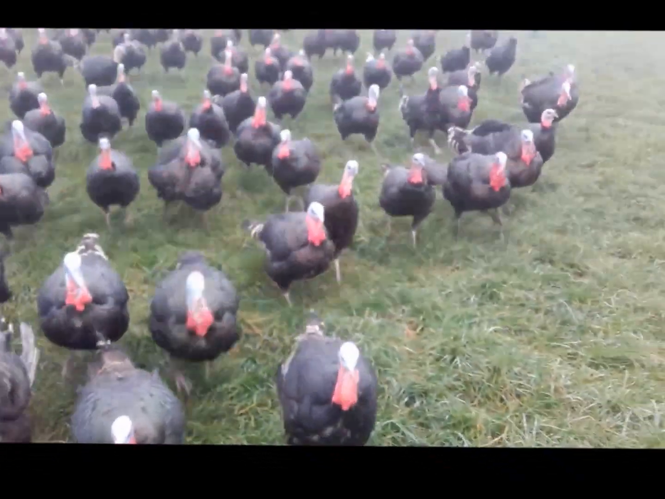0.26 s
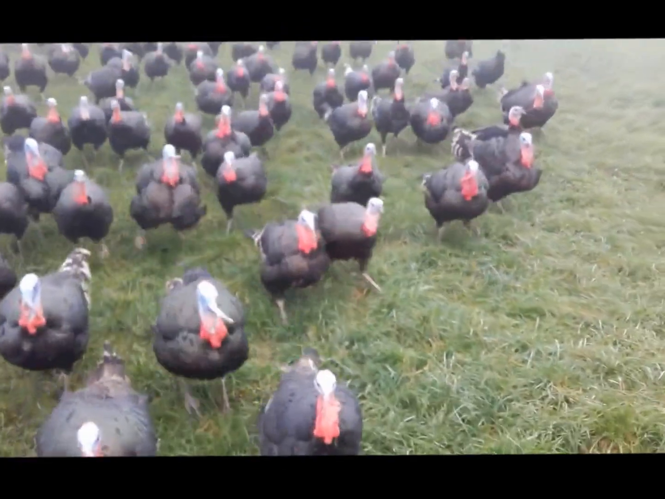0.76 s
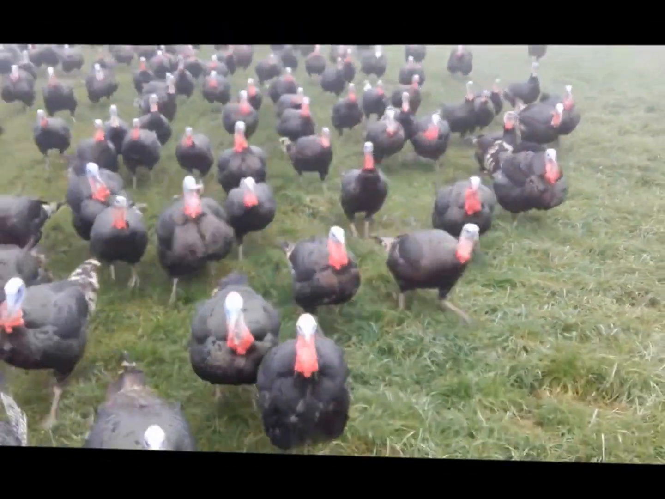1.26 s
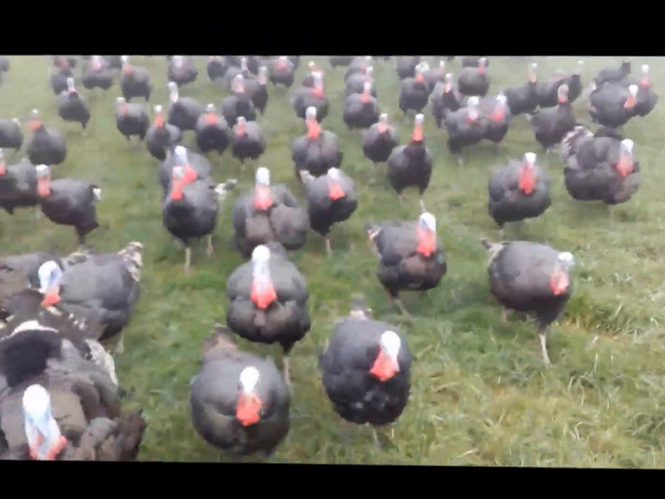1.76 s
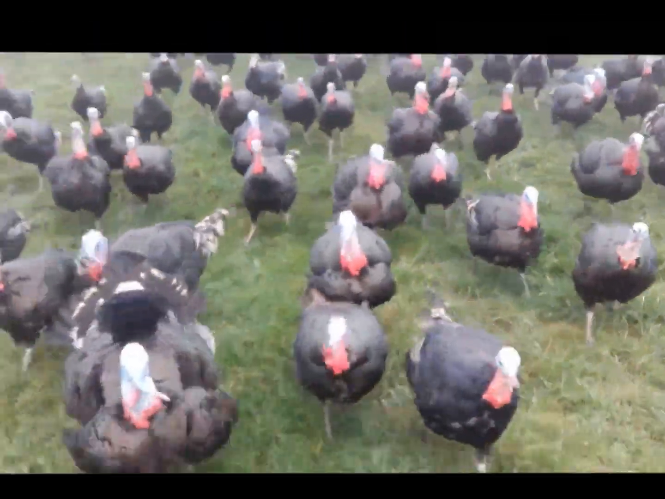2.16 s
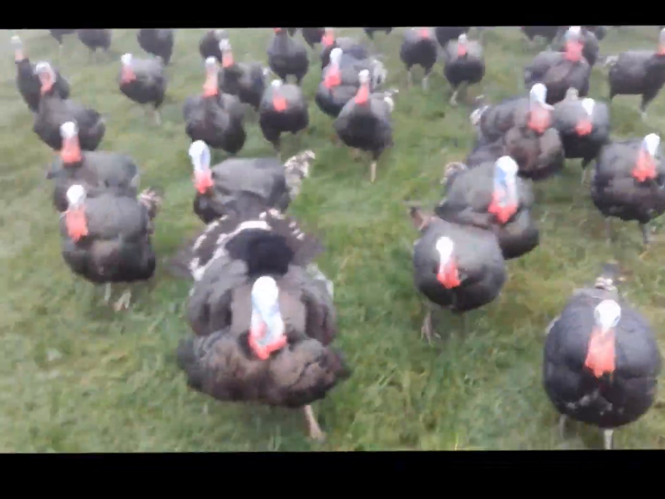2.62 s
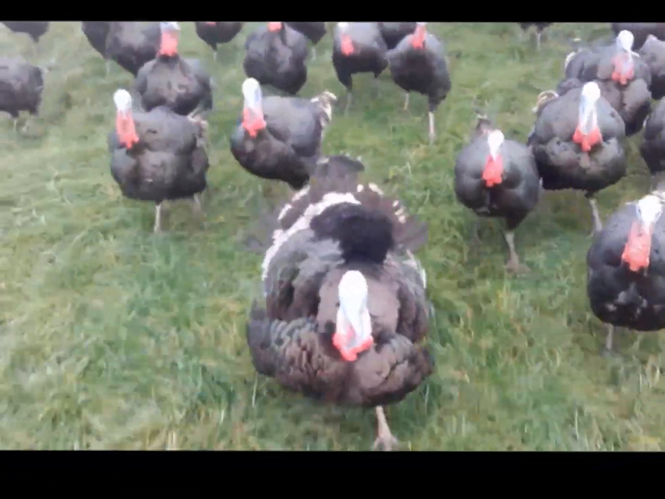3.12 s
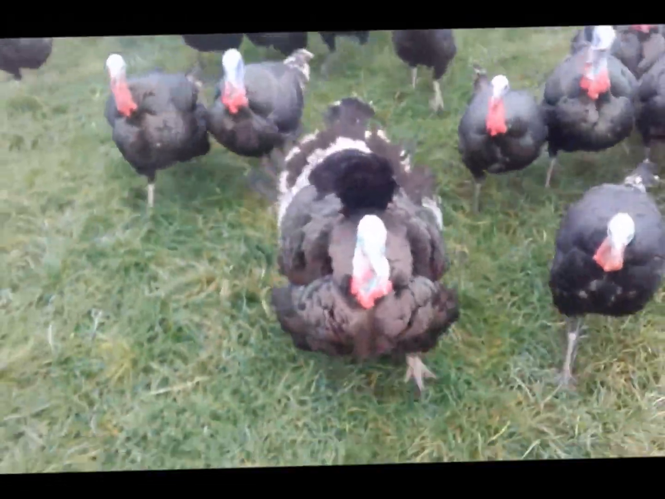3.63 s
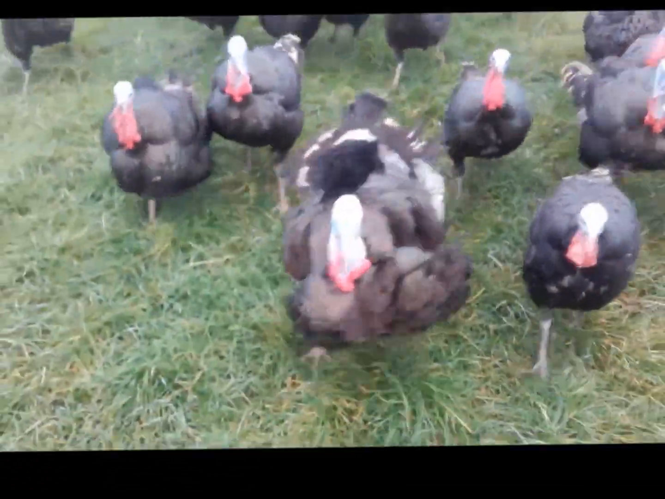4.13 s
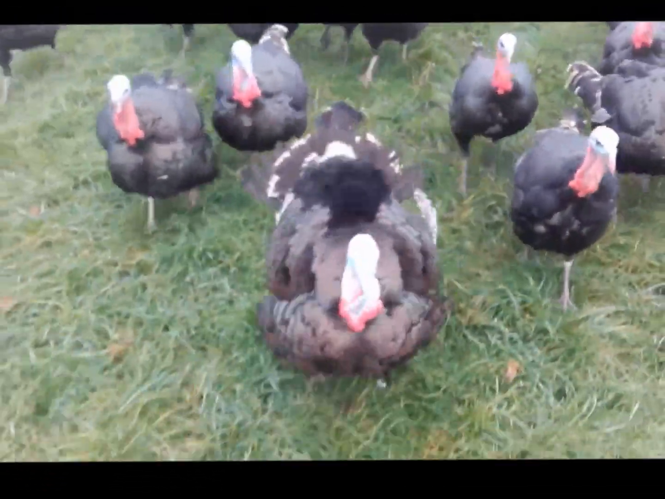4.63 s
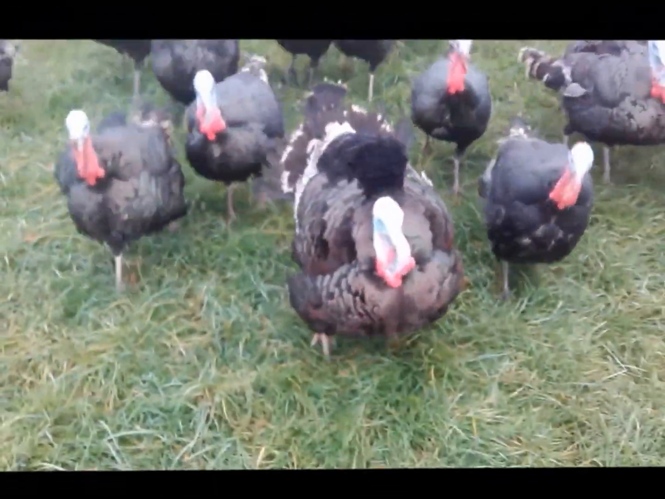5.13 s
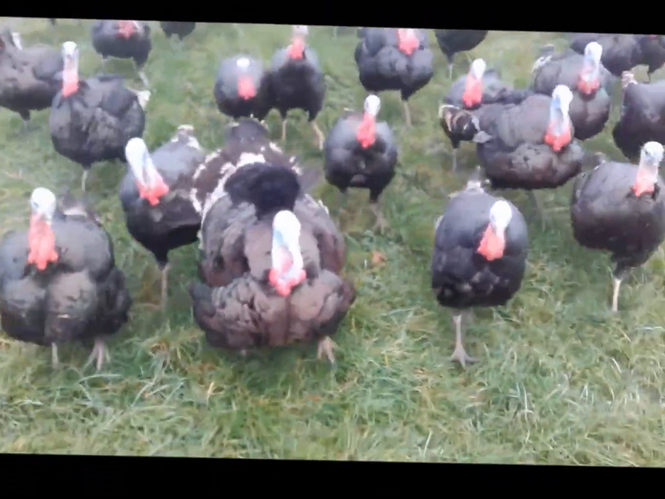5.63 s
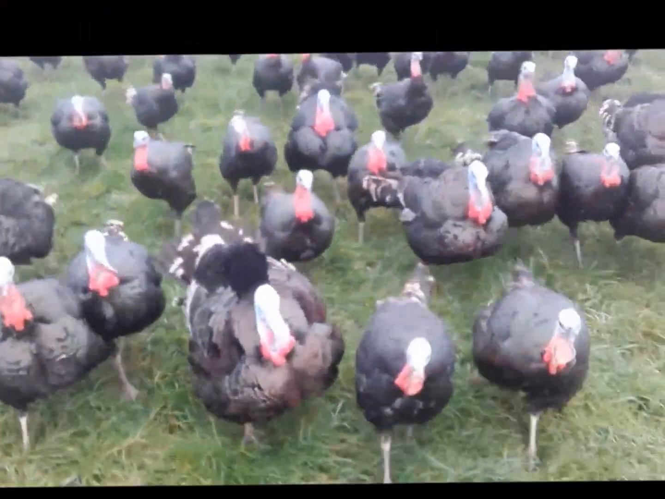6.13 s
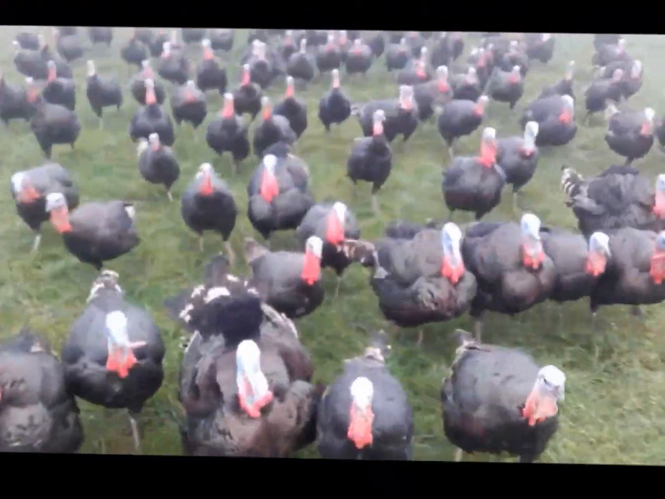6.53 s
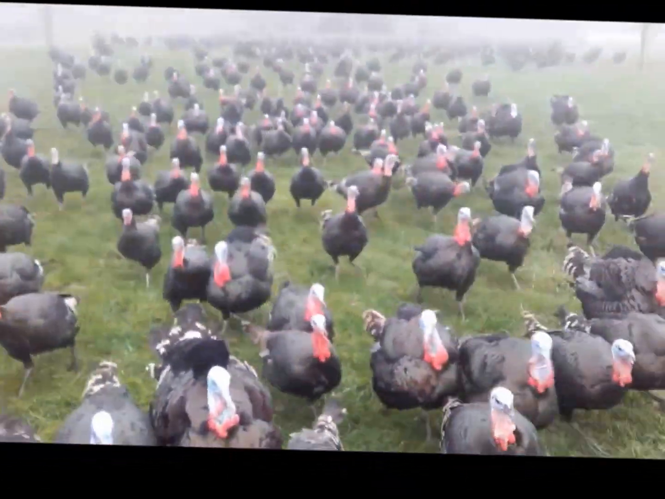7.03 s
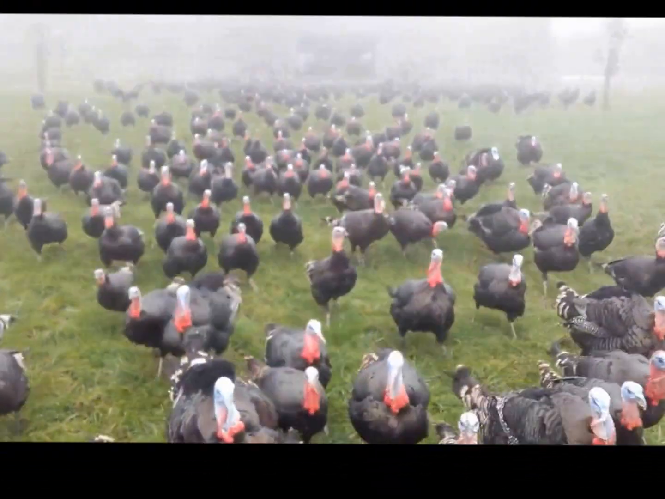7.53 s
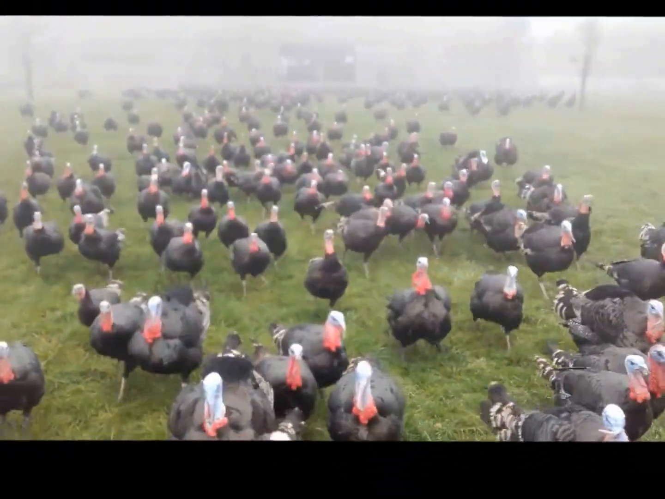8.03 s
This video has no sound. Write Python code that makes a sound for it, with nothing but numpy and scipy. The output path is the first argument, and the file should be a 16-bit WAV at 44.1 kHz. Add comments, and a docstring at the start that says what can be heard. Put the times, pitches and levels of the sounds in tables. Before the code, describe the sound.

Male turkeys let out short, rapid gobbles close by on an open field, with hens clucking and yelping and a large flock babbling behind.

```python
"""Turkey toms gobble close to the microphone on a grass field, sometimes overlapping: a held note, then about
19 swooping syllables a second. Hens yelp, whine and cluck nearby; the rest of the flock babbles further off.
Each call is a gliding tone with throat-shaped overtones and raspy half lines. The place itself is shaped noise:
a dull open-air rumble and a grainy treble hiss that swells as feet and feathers brush the grass."""
import sys
import numpy as np
from scipy import signal
from scipy.fft import rfft, irfft, next_fast_len
from scipy.io import wavfile
from scipy.ndimage import uniform_filter1d

SR = 44100
rng = np.random.default_rng(int(sys.argv[2]) if len(sys.argv) > 2 else 0)


def int16_out(signal):
    """Quantize to a 16-bit WAV file."""
    q = np.round(np.clip(np.atleast_2d(signal).T, -1, 1) * 32767)
    wavfile.write(sys.argv[1], SR, q.astype(np.int16))


N = 364707
TIME = np.arange(N) / SR

# gobbles close by: (first syllable [s], last syllable [s], syllables, pitch [Hz], sag of pitch by the end [octaves],
#   level [dB], crescendo [dB], overtones against the fundamental [dB], last leap [octaves], level of the leaps [dB],
#   swoop into each syllable [octaves], half length of a syllable [share of the beat],
#   held note [s], held note [Hz], held note [dB], scale of its swell [dB])
GOBBLES = [ (-.011, 0.083, 3, 899, 0.053, -11, 4.5, -18, 1.12, -21.5, 0.23, 0.3, .1, 960, -27, 13),
           (0.068, 0.246, 4, 871, 0.082, -27, 5.5, -4.5, 0.27, -37, 0.3, 0.29, 0.051, 1087, -23.5, 1),
           (0.372, .484, 3, 860, 0.014, -17, -4, -21, 0.61, -38.5, .4, 0.16, 0.074, 1024, -30, -0.5),
           (0.92, 1.125, 5, 932.6, 0.41, -16, -3, -11, 1.25, -21, 0.19, 0.32, 0.083, 970, -24, -0.5),
           (1.811, 2.047, 5, 844, 0.022, -29.5, -8, 2.5, 0.38, -54, 0.34, .31, 0.11, 1099, -32.5, -1.5),
           (2.591, 2.736, 4, 962.7, 0.29, -12, -4.5, -17.5, 1.15, -22, .14, 0.36, 0.12, 957, -22.5, 5),
           (2.648, 2.84, 4, 900, 0.029, -26.5, -6, 2, .9, -38, 0.35, 0.26, 0.064, 1053, -28.5, 5),
           (4.156, 4.357, 5, 920.5, 0.22, -13, -2, -11, 1.15, -19.5, 0.17, 0.31, .087, 985, -18.5, 11),
           (4.715, 4.953, 5, 883, 0.033, -23.5, -5.5, 0.5, 0.92, -35, .36, .31, .11, 1078, -32, 7),
           (5.477, 5.627, 4, 938, 0.025, -9.5, 4.5, -17, 0.81, -20, .16, 0.33, .14, 939, -21.5, 4),
           (6.115, 6.29, 4, 873, 0.056, -26.5, 3.5, 1.5, 1.05, -37, .36, .33, 0.13, 1085, -30, 0),
           (7.058, 7.158, 3, 890, .3, -27, -5, 5, 0.52, -37, 0.42, 0.49, 0.12, 975, -30.5, -7),
           (7.951, 8.130, 4, 890.6, 0.063, -22, -4.5, 4.5, 0.85, -37, 0.26, 0.37, .120, 1043, -22.5, 10.5)]
# babble of the birds further off: (time [s], level before the trim [dB])
FLOCK_LEVEL = [(0, -30), (.3, -47), (.7, -42.5), (1.1, -36), (1.22, -47.5), (1.45, -39.5), (2.15, -48),
               (2.6, -30.5), (2.95, -47.5), (3.9, -51), (5, -48), (5.4, -42.5), (5.9, -43.5), (6.7, -47.5),
               (7.05, -31.5), (7.38, -46), (7.7, -43.5), (8.27, -45.5)]
# open-air rumble: (time [s], level before the trim [dB])
AIR_LEVEL = [(0, -48), (2.1, -49.5), (2.8, -49.5), (3.5, -50.5), (5.8, -46.5), (6.4, -47.5), (8.27, -47.5)]
# treble hiss: (time [s], level before the trim [dB])
HISS_LEVEL = [(0, -54.5), (2.1, -53.5), (4.3, -50.5), (6, -51.5), (8.27, -50.5)]
# single clucks: (time [s], pitch [Hz], level [dB], overtones against the fundamental [dB], half length [s])
CLUCKS = [ (0.124, 753, -27.5, -6, 0.015), (0.741, 874, -30.5, -11, 0.0093), (1.34, 1287, -30.5, -3, 0.038),
          (2.444, 790, -27.5, -9.5, 0.021), (2.476, 950, -15.5, -27, 0.016),
          (3.222, 1000, -31.5, 2.5, 0.019), (3.332, 749, -32, -3, 0.019), (3.749, 862, -32, -15, 0.011),
          (5.257, 967, -24, -18, 0.021), (5.701, 709, -33, -0.5, 0.036), (5.860, 721, -27, -3.5, 0.018),
          (7.878, 915.5, -22, 7, .022), (8.002, 1024, -18.5, 6.5, 0.0086), (8.031, 872, -34, 8, 0.016),
          (8.212, 862, -28.5, -27, .015)]
# arched whines: (time [s], length [s], top pitch [Hz], rise [octaves], drop [octaves], level [dB],
#   overtones against the fundamental [dB])
WHINES = [ (1.592, 0.036, 1580, 0.041, 1, -25, -7), (3.144, .102, 1097, 0.13, .25, -38, 4),
          (3.272, 0.15, 1200, 0.076, 0.69, -33.5, -8), (3.427, 0.11, 1042, 0.048, 0.47, -30.5, -4),
          (3.533, 0.039, 1277, 0.025, 1, -29.5, -8), (4.553, 0.063, 975, 0.33, 0.46, -27, -27),
          (0.656, 0.066, 990, 0.12, 0.59, -40, -6), (1.182, 0.12, 1005, 0.043, 0.087, -51, 6),
          (3.653, 0.045, 821, .05, 0.16, -37.5, -12), (7.686, 0.091, 1430, .02, 0.11, -41, -15),
          (6.687, 0.039, 1505, .05, .3, -29, -6), (6.774, 0.069, 1014, 0.088, 0.24, -37, -2),
          (7.214, .122, 1309, 0.98, .85, -9.5, -0.5)]
# feet and feathers brushing the grass: (time [s], level [dB])
RUSTLES = [(.84, -50), (1.9, -49.5), (3.5, -50), (4.19, -58), (4.48, -50), (5.23, -50.5), (5.76, -46),
           (6.4, -49), (6.801, -45.5), (8.2, -48)]
# hens' yelps: (time [s], upsweep [s], whistle [s], fall [s], whistle [Hz], upsweep [dB], whistle [dB], fall [dB],
#   overtones against the fundamental [dB])
YELPS = [ (1.358, 0.02, 0.05, 0.038, 1545, -31.5, -24, -33, 2),
         (1.501, 0.027, 0.013, .020, 1644, -30.5, -31, -53, -8),
         (2.289, 0.053, 0.05, .050, 1590, -32.5, -28, -52, -6.5),
         (2.782, .026, 0.05, 0.067, 1640, -31.5, -20.5, -36.5, 1),
         (3.112, 0.03, .012, 0.012, 975, -35.5, -51, -56, 1.5),
         (3.297, 0.017, 0.019, .010, 1626, -36, -31, -50, 4),
         (3.375, 0.019, .008, 0.019, 1580, -32, -50, -59, 1.5),
         (3.426, 0.018, 0.02, 0.024, 1628, -27.5, -28, -41, -10),
         (3.598, 0.023, 0.018, 0.021, 1535, -33, -32, -46, 4.5),
         (3.942, .022, 0.021, .010, 1533, -50.5, -42, -59, 11),
         (4.546, 0.019, 0.0094, 0.018, 1000, -30, -41, -46, -5.5),
         (5.288, 0.027, 0.03, 0.026, 1613, -28, -23.5, -46, 0.5),
         (6.592, 0.021, .026, 0.017, 1608, -31.5, -23, -54, -1.5),
         (6.855, .020, 0.0069, 0.011, 1784, -18.5, -43, -51, -7),
         (6.907, 0.028, 0.042, 0.2, 1644, -17, -14.5, -15, -5.5),
         (7.182, 0.019, 0.017, 0.0072, 1650, -23, -22.5, -36, -6),
         (7.373, 0.032, 0.021, 0.078, 1640, -12, -18, -17.5, 2.5)]
# how squarely the calling birds face the microphone: (time [s], boost of the upper overtones [dB])
FACING = [(.1, 0.5), (1, -0.5), (1.8, -1.5), (2.7, 2.5), (4.2, -8.5), (6.3, -5.5), (7.3, -2.5), (7.9, -0.5)]
# what throat and beak let through of the overtones: (frequency [Hz], gain [dB])
THROAT = [(1500, 3), (2100, -0.5), (2400, -11), (2770, -25.5), (3200, -27), (3700, -32), (4600, -33),
          (5600, -37.5), (6500, -43), (7400, -55.5), (8400, -48.5), (10200, -37.5), (12000, -47)]
# the flock's voice at a distance, also used for half lines and throat noise: (frequency [Hz], gain [dB])
FAR_COLOUR = [(120, -50), (330, -20), (600, -8), (850, -2), (1400, 0), (2000, 1), (2500, -7), (3200, -22),
              (4600, -21), (7000, -40)]
# spectrum of the open air: (frequency [Hz], relative density [dB per Hz])
AIR_COLOUR = [(20, -26.5), (65, -28.5), (100, -8.5), (140, -3.5), (210, 1), (330, -4.5), (550, 3),
              (1200, 6), (3000, -8.5), (7000, -39.5)]
# spectrum of the hiss: (frequency [Hz], relative density [dB per Hz])
HISS_COLOUR = [(100, -15), (2000, -4.5), (3300, -15.5), (4400, -4.5), (5400, -10), (6400, -15), (7500, -20),
               (8500, -14), (9400, -4), (10200, 1.5), (11000, -4.5), (12000, -13.5), (13000, -5),
               (14000, -5), (15700, -8)]

AIR_DB, FLOCK_DB, HISS_DB, SCATTER_DB = -3, 2, -2, -25.5      # trims in the mix
CUTOFF_HZ = 15850
UNDERTONE_DB = -4      # extra cut of the half line below the fundamental
# a gobble from first to last syllable
ARCH_DB, SAG_CURVE = 2, 2.4      # the arch takes this off both ends; the pitch sags late
FIRST_LEAP, LEAP_GROWTH_DB, REED_GROWTH_DB = 0.222, 4, 5      # leaps grow from this share of the last
PITCH_CHANCE, REED_CHANCE_DB = .01, 1.5      # no two syllables are quite alike (octaves, dB)
DROP_S, DROP_HZ = 0.03, 580      # the last leap collapses to this pitch
DROP_DB, DROP_REED_DB = -2.5, -10.5      # against the leaps; overtones rise from twice this cut to this cut
# the note that opens a gobble: scoop, hold, flick
SCOOP_FROM, SCOOP_S, SCOOP_DB = .8, 0.02026, 1
HOLD_SAG, HOLD_REED_DB = .05, -1
FLICK_BEATS, FLICK_S, FLICK_UP, FLICK_DB, FLICK_END_DB = .72, .013, 1.17, -8, -9
# a cluck comes in from above and ends in a small, weak leap (octaves, octaves, dB)
CLUCK_SWOOP, CLUCK_LEAP, CLUCK_LEAP_DB = .15, 0.21, -24
CREST = 0.25      # a whine's top pitch comes at this share of its length
WHINE_DB_PER_OCTAVE, WHINE_FADE_DB = 10.5, 6      # lost below the top pitch; lost from start to end
# a yelp: pitches as shares of the whistle's
UPSWEEP_FROM, BREAK_AT, WHISTLE_SAG, FALL_TO = 0.49, .83, .93, .37
WHISTLE_PURITY_DB, WHISTLE_FADE_DB, FALL_FADE_DB = -2, -6, -9.5
UPSWEEP_ATTACK_DB, BREAK_DIP_DB = 17.5, 4      # it starts this much softer; it catches as the whistle ends
FALL_HOLLOW_DB = -12      # dip near the middle of the fall


def from_db(db):
    """Decibels to gain."""
    return 10 ** (np.asarray(db) / 20)


def rms_one(x):
    """Scale to unit power."""
    return x / np.sqrt(np.mean(x ** 2) + 1e-20)


def level(rows):
    """A (time [s], level [dB]) curve as a gain for every sample."""
    return from_db(np.interp(TIME, *np.transpose(rows)))


def gain_at(spectrum, hz):
    """Gain of a (frequency [Hz], gain [dB]) spectrum on a log-frequency axis."""
    points, db = np.transpose(spectrum)
    return from_db(np.interp(np.log(np.maximum(hz, 1)), np.log(points), db))


def coloured(x, spectrum):
    """Filter a signal by a smooth spectrum; rms 1."""
    size = next_fast_len(N + SR // 10)
    hz = np.arange(size // 2 + 1) * SR / size
    return rms_one(irfft(rfft(x, size) * gain_at(spectrum, hz), size)[:N])


def low_cut(x, hz):
    """Take off the bottom below a frequency."""
    return signal.sosfilt(signal.butter(2, hz, "high", fs=SR, output="sos"), x)


def drift(rate):
    """Smoothed chance, slower for a lower rate in Hz; rms 1."""
    r = np.exp(-2 * np.pi * rate / SR)
    noise = rng.standard_normal(N + SR)
    return rms_one(signal.lfilter([1], [1, -2 * r, r * r], noise)[SR:])


def span(start, end):
    """The samples between two times."""
    return slice(int(np.clip(start * SR, 0, N - 1)), int(np.clip(end * SR, 1, N)))


def add(track, where, sound):
    """Mix a sound into a track."""
    track[where] += sound


def facing(s):
    """Boost in dB of the upper overtones towards the microphone at a moment."""
    return np.interp(s, *np.transpose(FACING))


def unsteadiness(jitter, shimmer_db):
    """Quick tremor of pitch and strength."""
    return np.exp(jitter * drift(200)), from_db(shimmer_db * drift(160))


def syrinx(pitch, tone, overtones, rasp, facing_db, count=11, colour_db=3, crackle_db=4, beam_hz=2200, smear=1.27):
    """A tone with throat-shaped overtones; alternating strong and weak cycles add half lines."""
    phase = 2 * np.pi * (np.cumsum(pitch) / SR + rng.random())
    upper = gain_at(THROAT, 2 * pitch) * np.sin(2 * phase)
    steps = np.arange(len(pitch)) * 200 / SR      # a new random point every 5 ms
    for k in range(3, count + 1):
        # upper overtones differ from call to call and flicker in level and phase
        flicker, wobble = (np.interp(steps, np.arange(len(row)), row) for row in rng.standard_normal((2, 100)))
        beamed = np.clip(np.log2(k * np.mean(pitch) / beam_hz), 0, 1)      # only high overtones are directional
        gain = from_db(beamed * facing_db + colour_db * rng.standard_normal() + crackle_db * flicker)
        partial = gain_at(THROAT, k * pitch) * np.sin(k * phase + smear * wobble)
        upper += gain * partial * (k * pitch < SR / 2)
    halves = 0
    for k in (1, 3, 5):
        gain = from_db(UNDERTONE_DB * (k == 1)) * gain_at(FAR_COLOUR, k * pitch / 2)
        halves = halves + gain * np.sin(k * phase / 2)
    return tone * np.sin(phase) + overtones * upper + rasp * np.hypot(tone, overtones) * halves


def syllable(row, waver, flutter, rasp_db, count=11, turn=0.32, swell=0.8, leap_overtones=0.21,
             slack_hz=800, slack_db=9):
    """The pitch drops into a loud trough, then leaps up as the sound chokes off."""
    s, low, tone_db, over_db, half, leap, leap_db, swoop = row
    where = span(s - 2 * half, s + 2 * half)
    u = (TIME[where] - s) / half
    top = np.exp(-((u - 1) / .47) ** 2)
    trough = np.exp(-np.where(u < 0, u / swell, (u / .62) ** 2) ** 2)
    descent = swoop * np.clip((turn - u) / (1 + turn), 0, 1.5) ** 2
    pitch = low * 2 ** (descent + leap * top) * waver[where]
    squeak = from_db(leap_db) * top
    tone = from_db(tone_db) * trough + squeak
    overtones = from_db(over_db) * trough + leap_overtones * squeak
    # slack membranes beat unevenly: the lowest syllables rasp most
    rasp = from_db(rasp_db + slack_db * (low < slack_hz))
    sound = syrinx(pitch, tone, overtones, rasp, facing(s), count=count)
    return where, sound * flutter[where] ** (1 + 2 * top)      # the voice cracks in the leap


def note(rows, waver, flutter, rasp_db, count=11, edge_s=0.0061, clear_hz=1400, hoarse_hz=1000, clear_db=-20):
    """One gliding note with soft ends: hoarse where the pitch is low, clearer at the top."""
    s, pitch, tone_db, over_db = np.transpose(rows)
    where = span(s[0], s[-1])
    t = TIME[where]
    gate = np.clip(np.minimum(t - s[0], s[-1] - t) / edge_s, 0, 1)
    tone = from_db(np.interp(t, s, tone_db))
    overtones = from_db(np.interp(t, s, over_db))
    hz = np.interp(t, s, pitch)
    hoarse = np.clip((clear_hz - hz) / (clear_hz - hoarse_hz), .3, 1)
    upper_db = facing(s[0]) + clear_db * (1 - hoarse)
    voice = syrinx(hz * waver[where] ** hoarse, tone, overtones, hoarse * from_db(rasp_db), upper_db, count=count)
    return where, gate * flutter[where] ** hoarse * voice


def held_note(flick_s, length, hz, db, swell_db, reed_db):
    """Path of the note that opens a gobble: scoop, swelling or fading hold, flick."""
    start, held, leaves = flick_s - length, flick_s - length + SCOOP_S, flick_s - FLICK_S
    s = [start, held, (held + leaves) / 2, leaves, flick_s, flick_s + FLICK_S]
    pitch = hz * np.array([SCOOP_FROM, 1 + HOLD_SAG / 2, 1, 1 - HOLD_SAG / 2, FLICK_UP, 1])
    early, late = -.7 * swell_db, 0.37 * swell_db
    tone_db = db + np.array([early + SCOOP_DB, early, late / 2, late, FLICK_DB, FLICK_END_DB])
    return np.transpose([s, pitch, tone_db, tone_db + reed_db + HOLD_REED_DB])


def gobble(first, last, count, hz, sag, db, crescendo_db, reed_db, last_leap, leap_db, swoop, share,
           hold_s, hold_hz, hold_db, swell_db):
    """A tom's gobble: a held note, evenly spaced syllables with growing leaps, then a collapse in pitch."""
    count = int(round(count))
    beat = (last - first) / (count - 1)
    half, syllables = share * beat, []
    for along, (off_pitch, off_reed) in zip(np.linspace(0, 1, count), rng.standard_normal((count, 2))):
        low = hz * 2 ** (PITCH_CHANCE * off_pitch - sag * along ** SAG_CURVE)
        tone_db = db + crescendo_db * (along - .5) - ARCH_DB * (2 * along - 1) ** 2
        over_db = tone_db + reed_db + REED_GROWTH_DB * (along - .5) + REED_CHANCE_DB * off_reed
        leap = last_leap * (FIRST_LEAP + (1 - FIRST_LEAP) * along)
        squeak_db = leap_db + LEAP_GROWTH_DB * (along - .5)
        when = first + along * (last - first)
        syllables.append((when, low, tone_db, over_db, half, leap, squeak_db, swoop))
    top_s, drop_db = last + 1.1 * half, leap_db + DROP_DB
    drop = [(top_s, low * 2 ** last_leap, drop_db, drop_db + 2 * DROP_REED_DB),
            (top_s + DROP_S, DROP_HZ, drop_db, drop_db + DROP_REED_DB)]
    opening = held_note(first - FLICK_BEATS * beat, hold_s, hold_hz, hold_db, swell_db, reed_db)
    return [opening, drop], syllables


def ground_bounce(x, delay_s=0.003385, bounce_db=-15):
    """The grass returns a weak copy just after the direct sound; on fast glides the two beat."""
    return x + from_db(bounce_db) * np.interp(TIME - delay_s, TIME, x, left=0)


def throat_noise(voice, noise_db=-30):
    """Air rushing through the syrinx follows the strength of the call."""
    strength = np.sqrt(np.abs(uniform_filter1d(voice ** 2, SR // 200)))
    return from_db(noise_db) * strength * coloured(rng.standard_normal(N), FAR_COLOUR)


def field(x, count=70, t60=0.13, dull_hz=3500):
    """Weak, dull reflections scattered back by the ground and the birds' bodies."""
    delays = rng.uniform(0.003927, 0.13, count)
    echoes = np.zeros(SR // 2)
    places = np.minimum(delays * SR, SR // 2 - 1).astype(int)
    echoes[places] = rng.choice([-1, 1], count) * from_db(-60 * delays / t60)
    wet = signal.fftconvolve(x, echoes / np.linalg.norm(echoes))[:N]
    return signal.sosfilt(signal.butter(2, dull_hz, fs=SR, output="sos"), wet)


def far_birds(count=64):
    """Many overlapping distant birds, each giving an arched yelp and six syllables, merge into a babble."""
    out = np.zeros(N)
    waver, flutter = unsteadiness(jitter=.018, shimmer_db=1.5)
    for k, (when, size, pace, reed, distance) in enumerate(rng.random((count, 5))):
        start = (k + when) / count * (N / SR + .5) - .5
        low, period = 680 + 380 * size, .048 + .013 * pace
        db = -10 * distance
        over_db = db - 12 + 12 * reed
        arch = [(start, low, db - 12, over_db - 12),
                (start + .03, low * (1.5 + .5 * reed), db - 2, over_db - 6),
                (start + .11, low * 1.2, db - 8, over_db - 9)]
        add(out, *note(arch, waver, flutter, rasp_db=-17.5, count=3))
        for i in range(6):
            # each syllable dips lower and leaps further than the one before
            dip, leap = low * (1.15 - .05 * i), .2 * (i + 1)
            row = (start + .15 + i * period, dip, db, over_db, .02, leap, db - 6, .3)
            add(out, *syllable(row, waver, flutter, rasp_db=-48.0, count=3))
    out = coloured(out + .6 * field(out), FAR_COLOUR)
    # even out the swells of the crowd
    return rms_one(out / np.sqrt(uniform_filter1d(out ** 2, SR // 8) + 0.011))


def open_air(lump_db=3.6):
    """Dull open-air rumble: shaped noise that heaves slowly in level."""
    rumble = coloured(low_cut(rng.standard_normal(N), 90), AIR_COLOUR)
    return level(AIR_LEVEL) * from_db(AIR_DB + lump_db * drift(3.8)) * rumble


def grass_hiss(grain_db=1.5, flutter_db=2.33, brush_s=0.024):
    """Grainy treble noise that swells wherever the grass is brushed."""
    brushes = sum(from_db(db) * np.exp(-((TIME - s) / brush_s) ** 2) for s, db in RUSTLES)
    steady = from_db(HISS_DB + flutter_db * drift(6.8)) * level(HISS_LEVEL)
    grains = rng.standard_normal(N) * from_db(grain_db * drift(500))
    return np.hypot(steady, brushes) * coloured(grains, HISS_COLOUR)


def cluck(s, hz, db, reed_db, half):
    """A cluck is one syllable with a short swoop in and a weak leap out."""
    return s, hz, db, db + reed_db, half, CLUCK_LEAP, db + CLUCK_LEAP_DB, CLUCK_SWOOP


def whine(start, length, hz, rise, drop, db, reed_db, count=15):
    """Path of a whine: a quick rise and a longer drop, weakened by distance below its top pitch and by time."""
    u = np.linspace(0, 1, count)
    below = np.where(u < CREST, rise * (1 - u / CREST) ** 2, drop * ((u - CREST) / (1 - CREST)) ** 2)
    tone_db = db - WHINE_DB_PER_OCTAVE * below - WHINE_FADE_DB * u
    return np.transpose([start + u * length, hz * 2 ** -below, tone_db, tone_db + reed_db])


def yelp(start, up_s, whistle_s, fall_s, hz, up_db, whistle_db, fall_db, reed_db, break_s=0.0036):
    """Path of a yelp: a reedy upsweep breaks into a purer whistle, which sags, catches and falls back to reedy."""
    top, end = start + up_s, start + up_s + whistle_s
    pure_db, faded_db = reed_db + WHISTLE_PURITY_DB, whistle_db + WHISTLE_FADE_DB
    # (time [s], share of the whistle's pitch, level [dB], overtones against the fundamental [dB])
    stages = [(start, UPSWEEP_FROM, up_db - UPSWEEP_ATTACK_DB, reed_db),
              (start + up_s / 3, .63, up_db - 0.5, reed_db),
              (top, BREAK_AT, up_db, reed_db),
              (top + break_s, 1, whistle_db, pure_db),
              (end, WHISTLE_SAG, faded_db, pure_db),
              (end + 0.04 * fall_s, .88, faded_db - BREAK_DIP_DB, pure_db),
              (end + 0.12 * fall_s, .76, fall_db, reed_db),
              (end + .55 * fall_s, .68, fall_db + FALL_HOLLOW_DB, reed_db),
              (end + fall_s, FALL_TO, fall_db + FALL_FADE_DB, reed_db)]
    s, share, tone_db, over_db = np.transpose(stages)
    return np.transpose([np.sort(s), hz * share, tone_db, tone_db + over_db])


def near_birds():
    """Gobbles, clucks, whines and yelps close to the microphone; soft notes are hoarser than full-voiced ones."""
    notes = [yelp(*row) for row in YELPS] + [whine(*row) for row in WHINES]
    syllables = [cluck(*row) for row in CLUCKS]
    for row in GOBBLES:
        glides, swoops = gobble(*row)
        notes, syllables = notes + glides, syllables + swoops
    slow_waver = np.exp(.012 * drift(50))      # notes never stay quite on pitch
    out = np.zeros(N)
    waver, flutter = unsteadiness(jitter=.014, shimmer_db=.8)
    for row in syllables:
        add(out, *syllable(row, waver, flutter, rasp_db=-28.0))
    waver, flutter = unsteadiness(jitter=.018, shimmer_db=1.4)
    for rows in notes:
        soft = np.max(np.array(rows)[:, 2]) < -28
        add(out, *note(rows, waver * slow_waver, flutter, rasp_db=-16 if soft else -23))
    return low_cut(out, 420)


def scene():
    """Near birds with their reflections, the far flock, the open air and the grass."""
    near = ground_bounce(near_birds())
    near = near + throat_noise(near)
    reflections = from_db(SCATTER_DB) * field(near)
    flock = from_db(FLOCK_DB) * level(FLOCK_LEVEL) * far_birds()
    return (near + reflections + flock + open_air() + grass_hiss())[None]


def record(dry):
    """The top is cut steeply."""
    return signal.sosfilt(signal.ellip(10, .1, 80, CUTOFF_HZ, fs=SR, output="sos"), dry)


dry = scene()
out = record(dry)
int16_out(out)
```